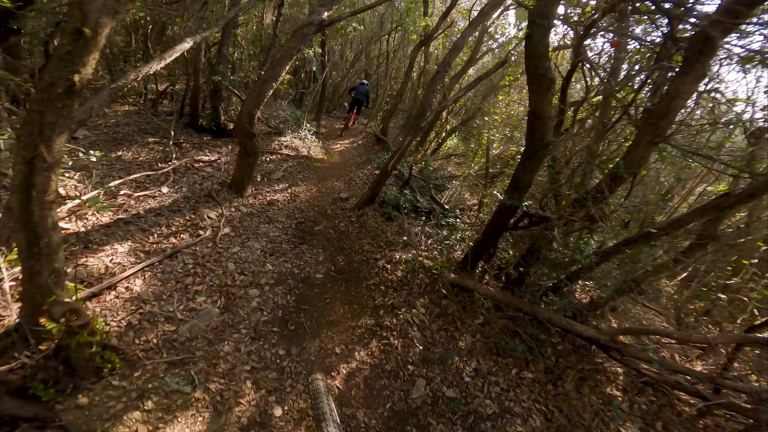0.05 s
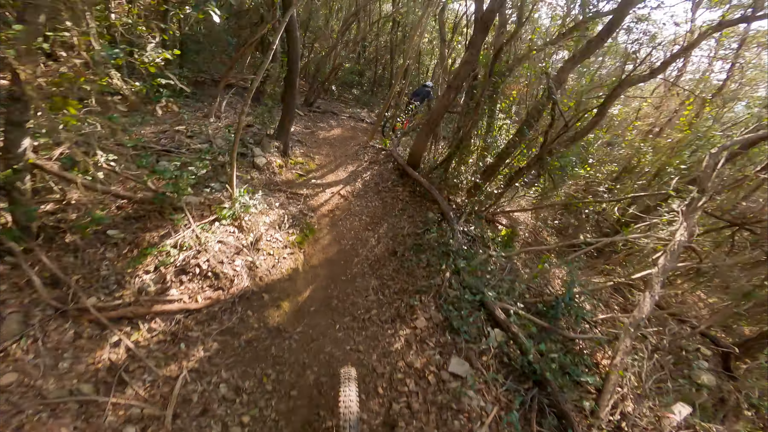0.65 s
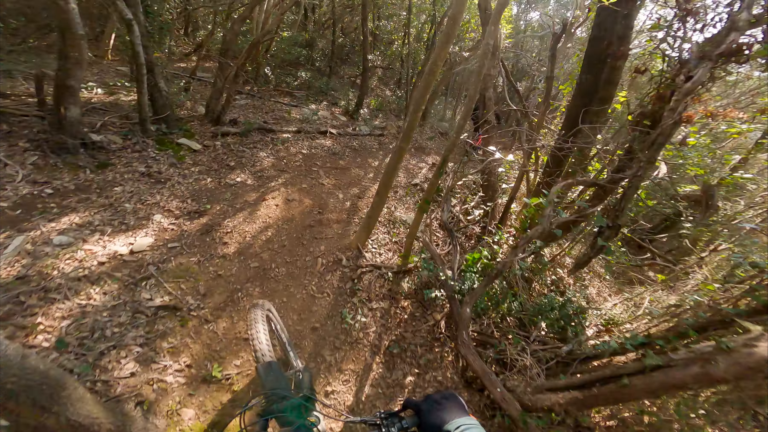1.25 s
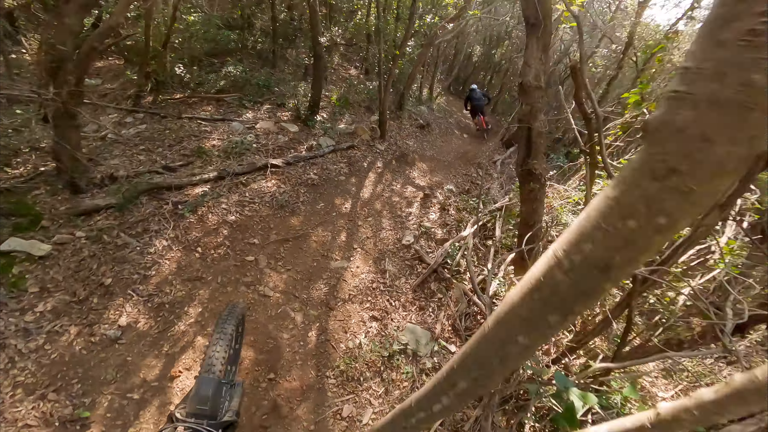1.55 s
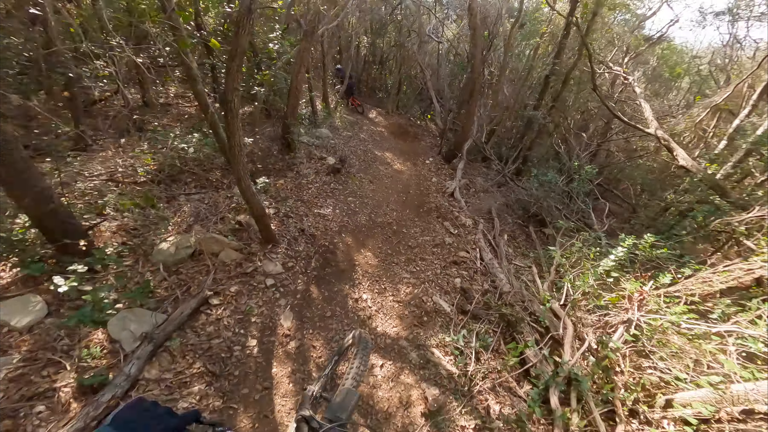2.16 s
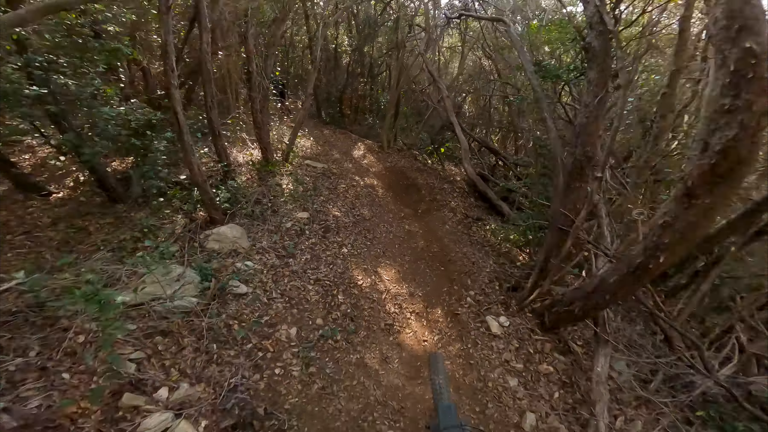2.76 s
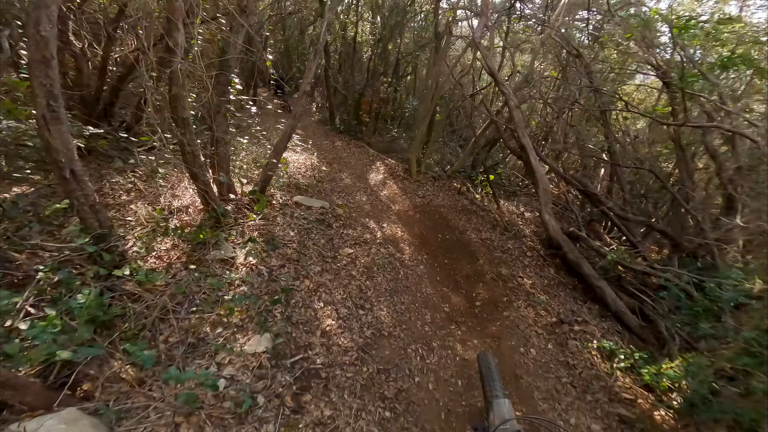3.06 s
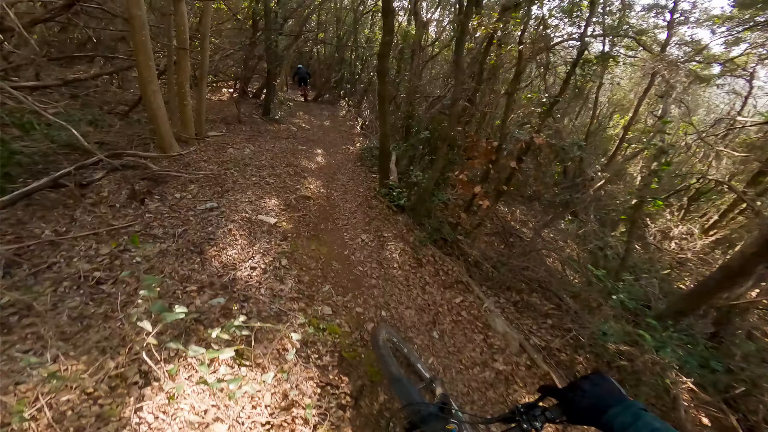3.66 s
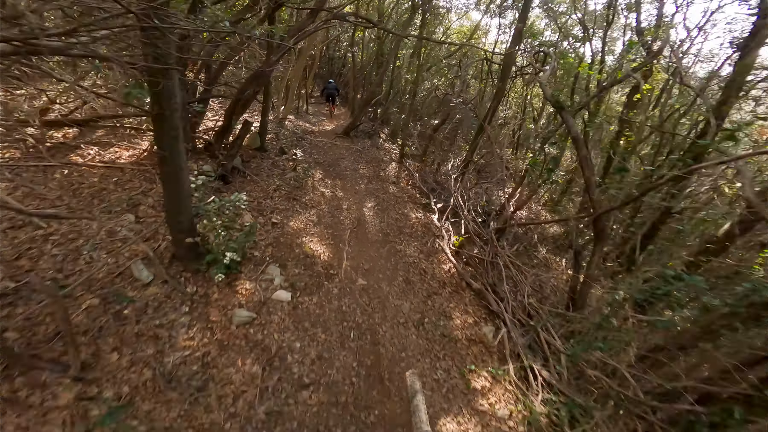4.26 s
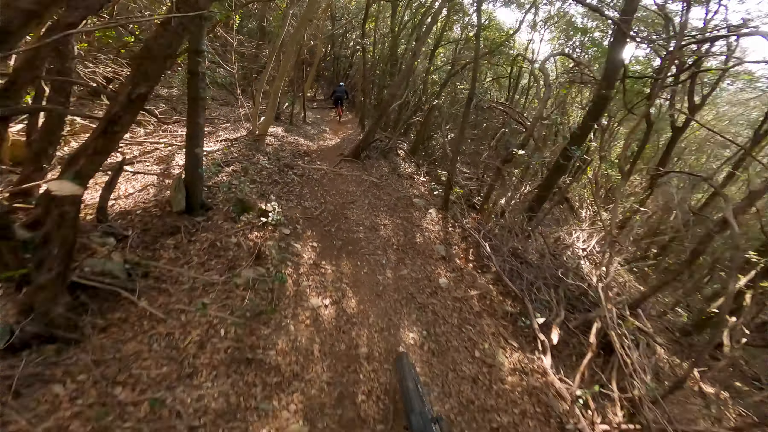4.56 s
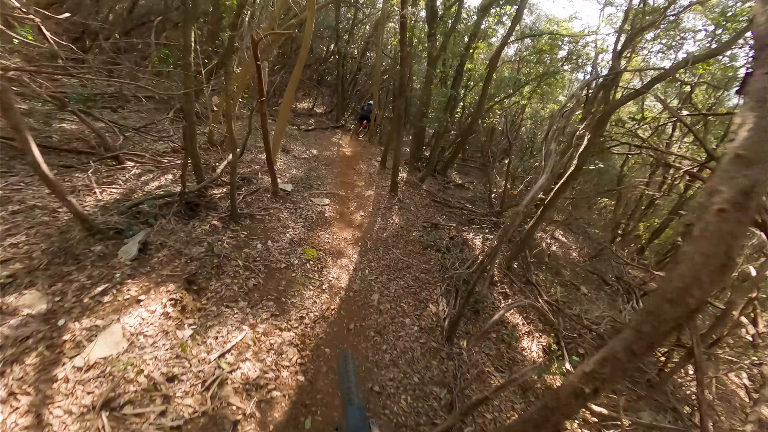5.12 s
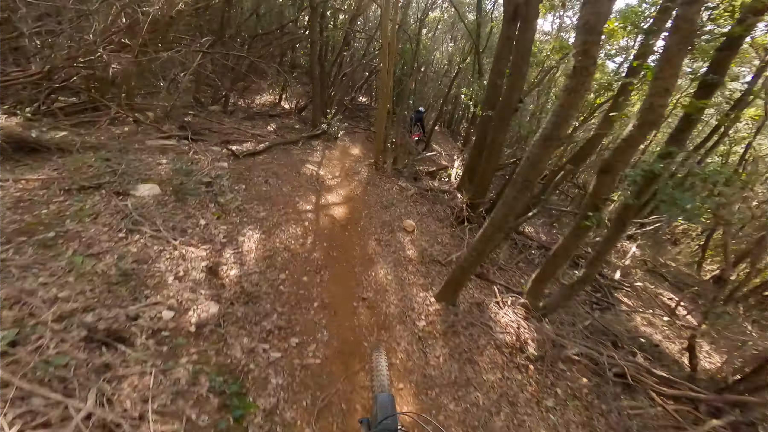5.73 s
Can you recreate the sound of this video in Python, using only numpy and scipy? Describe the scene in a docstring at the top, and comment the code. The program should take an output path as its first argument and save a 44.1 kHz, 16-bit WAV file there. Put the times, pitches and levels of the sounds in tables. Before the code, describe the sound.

Gusty wind thumps the microphone while bicycle tyres crunch along a leafy trail, with chain knocks and stone ticks.

```python
"""A mountain bike runs fast down a dry, leafy dirt trail, heard from a camera on the rider.
From the start, wind buffets the microphone, tyres crunch leaves and grit, bumps knock the chain and
cables on the frame, and stones tick on metal. From 1 to 1.7 s the brake disc grazes its pads and the
tyres scrape into a bend. The strongest gust tears past at 2.6 s, the tyres slide again from about
3.3 to 4.8 s, and the ride ends near 6 s with more gusts and knocks."""
import sys
import numpy as np
from scipy import signal
from scipy.fft import rfft, irfft, next_fast_len
from scipy.io import wavfile
from scipy.ndimage import uniform_filter1d, minimum_filter1d, map_coordinates

SR = 44100
rng = np.random.default_rng(int(sys.argv[2]) if len(sys.argv) > 2 else 0)


def dump(signal):
    """Clip the signal to [-1, 1] and save it as 16-bit WAV at the path in sys.argv[1]."""
    limited = np.clip(np.atleast_2d(signal).T, -1, 1)
    pcm = np.round(limited * 32767).astype(np.int16)
    wavfile.write(sys.argv[1], SR, pcm)


N = 264159

# How loud the roar of the air and its slow buffeting are: (time [s], relative level [dB])
ROAR_LEVEL = [(0.0, -24), (0.2, -24.5), (0.33, -28), (0.73, -30.5), (0.86, -24.5), (1.35, -32), (1.53, -32),
              (1.94, -37), (2.29, -26.5), (2.54, -21), (3.12, -25.5), (3.27, -39.5), (3.68, -27.5),
              (4.38, -21), (4.54, -33.5), (4.7, -21.5), (5.2, -22.5), (5.45, -22.5), (5.68, -32),
              (5.99, -35)]
BUFFET_LEVEL = [(0.0, -22.5), (0.55, -26.5), (0.8, -21.5), (1.57, -23.5), (1.78, -33), (2.08, -28),
                (2.55, -19.5), (3.65, -24.5), (4.75, -19), (5.99, -26.5)]
# Brief gusts and lulls that move both: (middle time [s], length [s], rise [dB])
GUSTS_AND_LULLS = [(0.03, 0.066, -0.5), (0.1, 0.058, -3), (0.18, 0.058, 1), (0.61, 0.029, 3.5),
                   (0.735, 0.034, -6), (1.04, 0.2, 2), (1.36, 0.24, 3.5), (2.18, 0.035, 0.5),
                   (2.32, 0.085, -3.5), (3.17, 0.018, -6), (3.205, 0.045, 6.5), (3.29, 0.08, -11),
                   (3.39, 0.074, 5.5), (3.54, 0.03, 8.5), (3.92, 0.037, 2.5), (4.09, 0.04, -4.5),
                   (4.47, 0.035, -6), (4.93, 0.072, -4.5), (5.46, 0.02, 5.5), (5.63, 0.0066, 11),
                   (5.72, 0.054, 0), (5.84, 0.15, 10), (5.99, 0.041, 9.5)]
# The wind's tone, from deepest to highest layer: (frequency [Hz], relative level [dB])
SWELL_TONE = [(8, -12), (22, 1.5), (42, -4), (60, -3.5), (110, -34), (300, -87)]
BUFFET_TONE = [(25, -43), (45, 3.5), (65, 1.5), (115, -1), (170, -12), (300, -23), (700, -85.5)]
ROAR_TONE = [(40, -61), (90, -5), (130, 2), (250, -1.5), (400, -6.5), (650, -12.5), (1000, -20),
             (2000, -44), (5000, -81)]
def wind():
    """Big swirls of air thump the microphone; faster air adds a roar that brightens as it grows."""
    gust_db = swells(GUSTS_AND_LULLS)
    roar_db = curve(ROAR_LEVEL) + gust_db
    buffet_db = curve(BUFFET_LEVEL) + 0.85 * gust_db + 1.07 * wobble(10)
    buffet = steadied(coloured(noise(N), BUFFET_TONE), span=0.063)
    swell = steadied(coloured(noise(N), SWELL_TONE), span=0.04)
    swell_db = -17 + 0.5 * buffet_db  # the deepest pressure swings ease less in the lulls
    swirls = noise(N) * amp(1.58 * wobble(90))
    bright = steadied(coloured(swirls, ROAR_TONE), span=0.05)
    dull = unit(filtered(bright, hump(0, 330)))
    force = np.clip((roar_db + 36.5) / 13, 0, 1)
    roar = force * bright + (1 - force) * dull
    return amp(swell_db) * swell + amp(buffet_db) * buffet + amp(roar_db + 3.5) * roar


# The tone of the strongest gust: (frequency [Hz], relative level [dB])
RUSH_TONE = [(200, -21), (400, 3), (620, -0.5), (900, -13), (1400, -24), (3000, -57.5)]
RUSH_AT_S, RUSH_LENGTH_S, RUSH_DB = 2.59, 0.25, -28.5
def rush():
    """The strongest gust tears at the microphone with a fluttering rush, higher than the roar."""
    level = swells([(RUSH_AT_S, RUSH_LENGTH_S, amp(RUSH_DB))])
    swirls = noise(N) * amp(2.1 * wobble(90))
    return level * steadied(coloured(swirls, RUSH_TONE), span=0.05)


# How loud rough ground, crushed leaves and flying grit are: (time [s], relative level [dB])
CHATTER_LEVEL = [(0.0, -34.5), (0.5, -34.5), (1.15, -32), (1.6, -31.5), (1.9, -37), (2.3, -28), (2.57, -36),
                 (2.75, -33), (3.12, -31.5), (3.27, -36.5), (3.36, -32), (3.55, -28.5), (3.75, -36),
                 (4.2, -30.5), (5.3, -32.5), (5.68, -34), (5.99, -31)]
LEAF_LEVEL = [(0.0, -50), (0.55, -49.5), (0.85, -48), (1.1, -42.5), (1.58, -47.5), (1.85, -46.5),
              (2.08, -46.5), (2.33, -39.5), (2.57, -46.5), (2.7, -47), (3.25, -45), (3.42, -42),
              (4.08, -43), (4.33, -48), (4.52, -42.5), (5.27, -45), (5.38, -53), (5.99, -40.5)]
GRIT_LEVEL = [(0.0, -58.5), (0.5, -61.5), (1.1, -54.5), (1.9, -55), (2.35, -49), (2.8, -64), (3.6, -68),
              (3.75, -49.5), (4.5, -55), (5.15, -53.5), (5.45, -63), (5.99, -54)]
# The tone of the same three: (frequency [Hz], relative level [dB])
CHATTER_TONE = [(150, -44), (450, -0.5), (800, 0), (1350, 1.5), (1800, -3.5), (2400, -11), (3200, -14.5),
                (5000, -29.5), (9000, -72)]
LEAF_TONE = [(800, -16), (2000, 2.5), (2800, 6), (3500, 2.5), (4400, 3.5), (5300, -3), (6700, -13),
             (8000, -11), (9000, -22.5), (10200, -35), (13000, -58.5)]
GRIT_TONE = [(3000, -34), (5500, 3.5), (6800, -1), (8000, 0), (9200, -6.5), (10200, -18), (11400, -31),
             (13000, -37)]
# Loose gravel is louder, smooth dirt quieter: (middle time [s], length [s], rise [dB])
GROUND_PATCHES = [(0.45, 0.091, 4.5), (0.63, 0.019, 4), (0.675, 0.039, -2), (0.72, 0.046, 9),
                  (1.29, .03, 8), (1.57, 0.066, 4.5), (1.88, 0.026, -7), (2.255, 0.038, 4.5),
                  (2.565, 0.057, -6), (2.67, 0.038, 0.5), (3.53, 0.1, 1), (4.09, 0.075, 2),
                  (4.265, 0.069, 3.5), (4.51, 0.024, 4), (4.95, 0.046, 5.5), (5.29, 0.058, 5.5),
                  (5.39, 0.081, 2.5), (5.53, 0.15, 5.5), (5.785, 0.074, 6.5)]
def tyres():
    """The tread drums on dirt, rattles loose parts, crushes leaves and flings grit, more so on gravel."""
    gravel_db = swells(GROUND_PATCHES)
    bumps_db = 1.5 * wobble(rate=24)
    crunch_db = curve(LEAF_LEVEL) + gravel_db + 0.39 * bumps_db
    spray_db = curve(GRIT_LEVEL) + gravel_db + 0.7 * bumps_db
    chatter_db = curve(CHATTER_LEVEL) + 0.46 * gravel_db + bumps_db
    dirt = steadied(coloured(grains(rate=1400, spread_db=1, t60=0.0084), CHATTER_TONE), span=0.029)
    loose_parts = steadied(unit(frame(grains(rate=170, spread_db=3.5, t60=0.028))), span=0.22)
    rustle = coloured(grains(rate=1100, spread_db=-1, t60=0.02), LEAF_TONE)
    crackle = steadied(coloured(grains(rate=130, spread_db=0, t60=0.046), LEAF_TONE), span=0.1)
    grit = coloured(grains(rate=1300, spread_db=-0.5, t60=0.012), GRIT_TONE)
    pebbles = steadied(coloured(grains(rate=30, spread_db=2, t60=0.0097), GRIT_TONE), span=0.55)
    chatter = amp(chatter_db - 1.5) * dirt + amp(chatter_db - 3.5) * loose_parts
    leaves = amp(crunch_db) * rustle + amp(crunch_db - 1) * crackle
    spray = amp(spray_db - 2) * (grit + amp(-8) * pebbles)
    return chatter + leaves + spray


# Sharp knocks, mostly the chain and cables hitting the frame: (time [s], relative level [dB], pitch [Hz], fade
# time [s])
FRAME_HITS = [(0.209, -16, 1700, 0.013), (0.212, -11, 2000, 0.02), (0.2238, -9.5, 2110, 0.013),
              (0.2648, -11.5, 1400, 0.0037), (0.2692, 5, 1700, 0.003), (0.2756, -13, 1680, 0.032),
              (0.518, -11.5, 1150, 0.025), (0.532, -19, 1250, 0.023), (0.568, -11, 1390, .016),
              (0.622, -11, 1300, 0.014), (0.724, -13, 1300, 0.021), (0.846, -12, 1200, 0.021),
              (0.939, -13, 2010, 0.035), (1.179, -12, 1900, .012), (1.278, -14, 1900, 0.034),
              (1.384, -11, 1500, 0.029), (1.398, -9, 1300, 0.015), (1.419, -8.5, 1150, 0.013),
              (1.495, -10.5, 1200, 0.019), (1.61, -19, 1300, .018), (1.685, -16.5, 1090, .035),
              (1.955, -9.5, 1280, 0.026), (2, -13, 1500, 0.012), (2.013, -9, 1350, 0.016),
              (2.024, -10.5, 1250, 0.021), (2.072, -16, 1490, .024), (2.117, -10.5, 1350, .026),
              (2.156, -14, 1000, 0.024), (2.272, -12, 1100, 0.03), (2.324, -12.5, 1500, 0.023),
              (2.645, -19, 1700, .03), (2.825, -11, 1400, 0.023), (3.001, -11, 1400, 0.035),
              (3.183, -7.5, 1300, 0.014), (3.248, -13, 1520, 0.012), (3.373, -8.5, 1100, 0.014),
              (3.398, -13, 1350, 0.033), (3.492, -9, 1350, 0.015), (3.555, -22, 1100, 0.013),
              (3.744, -16.5, 1200, 0.023), (3.825, -17, 1300, .016), (4.136, -9.5, 1300, 0.018),
              (4.437, -13, 1400, 0.025), (4.946, -9, 1800, 0.0096), (4.986, -11, 1250, 0.017),
              (5.066, -18, 1800, 0.058), (5.482, -9.5, 1920, 0.052), (5.49, -11, 1720, 0.053),
              (5.76, -20, 1400, .016), (5.792, -13, 1900, 0.042), (5.885, -15.5, 1620, 0.074),
              (5.959, -16, 1600, 0.014)]
def knocks():
    """Mostly chain and cables hitting the frame: one link clacks, several knock; where they land sets the tone."""
    track, t = np.zeros(N), np.arange(SR // 10) / SR
    for s, db, centre_hz, t60 in FRAME_HITS:
        blow = filtered(noise(len(t)), hump(centre_hz, 850))
        clack = steadied(frame(blow, stretch=1 + rng.normal(0, 0.06)), span=0.003)
        shape = rise_and_fall(t, rise=0.094 * t60, hold=0.15 * t60, fall=t60)
        add(track, s, amp(db - 11.5) * clack * shape)
    return track


# Where the frame and its plastic parts ring: (pitch [Hz], width [Hz], relative level [dB])
FRAME_NOTES = [(893, 385, -4.5), (1253, 282, 4.5), (1422, 430, 1), (2264, 550, -2), (2575, 670, -3.5),
               (4240, 1500, -27)]
def frame(x, stretch=1):
    """A hit x rings the frame dully, its pitches times stretch; padded tubes swallow the treble."""
    def response(hz):
        f = hz / stretch
        ringing = sum((-1) ** k * amp(db) * 1j * f * width / (pitch ** 2 - f ** 2 + 1j * f * width)
                      for k, (pitch, width, db) in enumerate(FRAME_NOTES))
        return ringing / (1 + 1j * hz / 4500) ** 2 / (1 + (hz / 3150) ** 10)
    return filtered(x, response)


# Roots and stones: (time [s], length [s], rattle level [dB], note pitch [Hz], note level [dB])
ROUGH_PATCHES = [(0.461, 0.03, -32.5, 1180, -29), (0.734, 0.04, -33.5, 1240, -38),
                 (1.269, 0.035, -34, 1400, -40), (1.573, 0.031, -29, 1050, -30),
                 (1.783, 0.021, -26.5, 950, -26), (2.15, 0.024, -24.5, 730, -22.5),
                 (2.21, 0.033, -42, 930, -39), (3.31, 0.035, -29, 1440, -33),
                 (3.47, 0.018, -31.5, 1400, -40), (3.541, 0.05, -30.5, 1020, -34),
                 (5.35, 0.019, -29.5, 845, -37), (5.483, 0.04, -29, 765, -28),
                 (5.536, 0.053, -33, 1300, -47), (5.791, 0.034, -23, 1310, -28.5),
                 (5.83, 0.031, -40, 1170, -26.5), (5.977, .02, -25.5, 800, -22)]
def shakes():
    """A rough patch throws the chain into a quick rattle over a hollow note."""
    notes, rattle_level, t = np.zeros(N), np.zeros(N), np.arange(SR // 10) / SR
    rattle = steadied(unit(frame(grains(rate=340, spread_db=-1, t60=0.011))), span=0.022)
    for s, length, rattle_db, note_hz, note_db in ROUGH_PATCHES:
        shape = rise_and_fall(t, rise=0.016, hold=length, fall=0.036)
        hollow = filtered(noise(len(t)), hump(note_hz, 260, steepness=2))
        add(rattle_level, s, amp(rattle_db) * shape)
        add(notes, s, amp(note_db) * shape * steadied(hollow, span=0.008))
    return notes + rattle_level * rattle


# Low booms from the ground: (middle time [s], length [s], level [dB], pitch [Hz])
GROUND_BOOMS = [(0.181, 0.12, -23, 219), (0.81, 0.14, -22.5, 118), (1.057, 0.27, -22.5, 126),
                (1.15, 0.4, -28.5, 234), (1.362, 0.22, -22.5, 115), (3.051, 0.24, -19.5, 113.6),
                (3.204, 0.026, -20.5, 263), (3.54, 0.035, -18.5, 270)]
def booms():
    """The bike presses into the ground with a smooth swell of low noise."""
    track, t = np.zeros(N), np.arange(SR // 2) / SR - 0.25
    for s, length, db, centre_hz in GROUND_BOOMS:
        rumble = filtered(noise(len(t)), hump(centre_hz, 0.39 * centre_hz, steepness=2))
        boom = amp(db) * np.exp(-(2 * t / length) ** 2) * steadied(unit(rumble), span=0.13)
        add(track, s + t[0], boom[s + t >= 0])
    return track


# Moments when the bike leans or drifts: (middle time [s], length [s], level [dB])
SLIDES = [(1.05, 0.33, -34.5), (1.307, 0.065, -36), (1.546, .2, -35), (3.44, 0.33, -41), (3.896, .36, -47),
          (4.67, 0.33, -37)]
# The tone of a slide: (frequency [Hz], relative level [dB])
SLIDE_TONE = [(600, -15), (1000, 6.5), (1450, 3.5), (1900, 2), (2400, -0.5), (3200, -7), (4100, -14),
              (4700, -6), (5400, -22), (7000, -39)]
def scrapes():
    """The tyres' side knobs slide over dirt and leaves in a gritty rasp that swells and fades."""
    level = swells([(s, length, amp(db)) for s, length, db in SLIDES])
    return level * steadied(coloured(grains(rate=800, spread_db=0, t60=0.015), SLIDE_TONE), span=0.06)


# Stone hits: (time [s], relative snap level [dB], relative ping level [dB], ping pitch [Hz])
STONE_HITS = [(0.101, -34, -47, 7800), (0.145, -32, -33, 5700), (0.1566, -25.5, -44, 6100),
              (0.214, -24, -50, 8000), (0.225, -37, -41, 7800), (0.268, -30, -42, 6500),
              (0.303, -29, -41, 6500), (0.602, -24, -49, 8000), (0.637, -23, -41, 7800),
              (0.712, -21.5, -38, 5840), (0.772, -29, -41, 5800), (0.809, -28, -38, 5800),
              (0.875, -25, -42, 5700), (0.969, -17, -49, 5000), (1.131, -40, -43, 6200),
              (1.18, -20, -38, 5700), (1.298, -35, -43, 6800), (1.357, -25, -40, 6300),
              (1.3818, -21.5, -39, 7000), (1.482, -29, -36, 6150), (1.5418, -20, -42, 5700),
              (1.655, -24, -42, 6200), (1.731, -37, -31.5, 6060), (1.742, -40, -43, 6200),
              (2.149, -21, -40, 6040), (2.2433, -18, -29.5, 6350), (2.262, -20.5, -31, 5700),
              (2.272, -16, -42, 6000), (2.324, -27, -37, 6000), (2.48, -23, -44, 5700),
              (2.652, -24, -39, 6000), (2.755, -23.5, -44, 6000), (3.155, -25, -52, 5700),
              (3.415, -27, -34, 5800), (3.47, -18.5, -45, 4700), (3.699, -23, -38, 6100),
              (3.747, -25, -39, 6200), (3.783, -31, -35, 6300), (3.825, -27, -38, 6100),
              (4.033, -31, -35, 5900), (4.086, -32, -32, 5900), (4.208, -24, -41, 5800),
              (4.233, -24, -32, 5640), (4.265, -24, -34, 7900), (4.283, -34, -40, 5900),
              (4.44, -20.5, -25, 5140), (4.613, -22, -45, 5700), (4.722, -23, -39, 7040),
              (4.975, -24, -36, 5670), (5.128, -31, -35, 7800), (5.14, -29, -33, 6060),
              (5.1633, -37, -39, 7800), (5.187, -22.5, -46, 5800), (5.236, -22, -40, 6000),
              (5.4, -38, -37, 5770), (5.413, -41, -37, 5900), (5.43, -35, -33, 5900),
              (5.768, -35, -33, 5970), (5.8037, -16, -38, 6800)]
# The tone of a snap: (frequency [Hz], relative level [dB])
SNAP_TONE = [(1000, -14), (3000, 10.5), (5300, 2.5), (7000, -19.5), (8500, -14.5), (10500, -24.5),
             (13000, -44)]
def ticks():
    """A stone hits a rim or spoke: a dry snap and a short, rough ping, pitched by the part it hits."""
    track, t = np.zeros(N), np.arange(SR // 10) / SR
    for s, db, ping_db, ping_hz in STONE_HITS:
        snap = steadied(coloured(noise(len(t)), SNAP_TONE), span=0.0022) * fade(t, t60=0.026)
        steel = hump(ping_hz, 1500, steepness=2)  # wide, as small steel parts barely ring
        ping = steadied(filtered(noise(len(t)), steel), span=0.0041) * fade(t, t60=0.024)
        onset = 1 - fade(t, t60=0.0027)
        add(track, s, (amp(db - 7) * snap + amp(ping_db - 2.5) * ping) * onset)
    return track


# The chain landing on the gears: (time [s], level [dB])
CHAIN_LANDINGS = [(0.213, -50), (0.606, -49), (2.243, -36), (4.086, -39.5), (4.265, -35), (4.44, -47),
                  (5.128, -46), (5.803, -41.5)]
SPROCKET_HZ, SPROCKET_WIDTH_HZ = 7930, 300
def chinks():
    """The slack chain lands on a sprocket (a gear wheel), which rings briefly at one high pitch."""
    track, t = np.zeros(N), np.arange(SR // 10) / SR
    sprocket = hump(SPROCKET_HZ, SPROCKET_WIDTH_HZ, steepness=2)
    for s, db in CHAIN_LANDINGS:
        ring = steadied(filtered(noise(len(t)), sprocket), span=0.008)
        add(track, s, amp(db) * ring * rise_and_fall(t, rise=0.0036, hold=0, fall=0.061))
    return track


# Light touches of the brake before the bend: (time [s], length [s], pitch [Hz], level [dB])
BRAKE_TOUCHES = [(1.017, 0.0066, 5230, -43), (1.195, .014, 5060, -46), (1.26, 0.021, 5380, -44),
                 (1.413, 0.0066, 5080, -40), (1.456, .009, 5130, -42), (1.484, 0.022, 5130, -47),
                 (1.539, .009, 5100, -46), (1.594, .008, 4980, -45), (1.631, .007, 5070, -42),
                 (1.67, 0.0085, 5170, -42)]
def brake():
    """Each graze of the pads makes the brake disc scrape out a short, thin, wavering note."""
    track, t = np.zeros(N), np.arange(SR // 10) / SR
    for s, length, hz, db in BRAKE_TOUCHES:
        wavering_hz = hz * (1 + 0.023 * wobble(830)[:len(t)])
        phase = 2 * np.pi * np.cumsum(wavering_hz) / SR
        shape = rise_and_fall(t, rise=0.022, hold=length, fall=0.022)
        add(track, s, amp(db) * shape * unit(np.sin(phase)))
    return track


# How loud the highest hiss is: (time [s], relative level [dB])
HISS_LEVEL = [(0.0, -82), (0.86, -86), (1.0, -71), (1.66, -74), (1.76, -80), (2.08, -80), (2.26, -67),
              (2.5, -70), (2.6, -78.5), (3.6, -78), (3.7, -70.5), (5.25, -77), (5.42, -87), (5.99, -74)]
# Its tone: (frequency [Hz], relative level [dB])
HISS_TONE = [(9000, -31), (10400, -8), (11200, 3.5), (12300, -4.5), (13200, -6), (15000, -37)]
def hiss():
    """A faint, grainy hiss above the grit comes and goes, and rises on loose gravel."""
    level_db = curve(HISS_LEVEL) + 0.8 * swells(GROUND_PATCHES) + wobble(14)
    return amp(level_db) * coloured(grains(rate=1200, spread_db=-1, t60=0.012), HISS_TONE)


def amp(db):
    """Turn decibels into a number to multiply by."""
    return 10 ** (np.asarray(db) / 20)


def unit(x):
    """Scale x to an average (rms) level of 1."""
    return x / np.sqrt(np.mean(x ** 2) + 1e-20)


def noise(samples):
    """Plain white noise."""
    return rng.standard_normal(samples)


def curve(rows):
    """Join (time [s], value) points with straight lines."""
    return np.interp(np.arange(N) / SR, *np.transpose(rows))


def swells(rows):
    """Add up bell-shaped rises given as (middle time [s], length [s], height)."""
    t = np.arange(N) / SR
    return sum(height * np.exp(-(2 * (t - s) / length) ** 2) for s, length, height in rows)


def wobble(rate):
    """A smooth curve through rate random points a second."""
    return map_coordinates(noise(int(N * rate / SR) + 4), [np.arange(N) * rate / SR])


def grains(rate, spread_db, t60):
    """Tiny random bursts, about rate a second, each fading in t60 seconds."""
    starts = rng.random(N) < rate / SR
    sizes = starts * amp(spread_db * np.clip(noise(N), -2, 2))
    energy = signal.lfilter([1], [1, -amp(-120 / (t60 * SR))], sizes ** 2)
    return unit(np.sqrt(energy) * noise(N))


def filtered(x, response):
    """Turn each frequency in x up or down by response(hz)."""
    size = next_fast_len(len(x) + 8192)
    return irfft(rfft(x, size) * response(np.fft.rfftfreq(size, 1 / SR)), size)[:len(x)]


def hump(centre_hz, width_hz, steepness=1):
    """A filter shape that keeps the frequencies near centre_hz."""
    return lambda hz: 1 / (1 + ((hz - centre_hz) / width_hz) ** 2) ** steepness


def coloured(x, tone):
    """Shape x with a tone table, at an average level of 1."""
    f, db = np.transpose(tone)
    return unit(filtered(x, lambda hz: amp(np.interp(np.log(hz + 1), np.log(f), db))))


def steadied(x, span):
    """Even out changes in loudness slower than span seconds."""
    return x / np.sqrt(np.abs(uniform_filter1d(x ** 2, int(span * SR))) + 1e-6)


def fade(t, t60):
    """Die away, 60 dB down after t60 seconds."""
    return np.exp(-np.log(1000) * t / t60)


def rise_and_fall(t, rise, hold, fall):
    """Fade in, then fade out from time hold; all in seconds."""
    return (1 - fade(t, rise)) * fade(np.maximum(t - hold, 0), fall)


def add(track, s, sound):
    """Mix a sound into the track at s seconds."""
    part = track[max(round(s * SR), 0):][:len(sound)]
    part += sound[:len(part)]


def scene():
    """Everything is close and in the open air, so nothing echoes."""
    air_and_ground = wind() + rush() + booms() + tyres() + scrapes() + hiss()
    bike_parts = knocks() + shakes() + ticks() + chinks() + brake()
    return (air_and_ground + bike_parts)[None]


def record(dry):
    """The camera turns down the loudest peaks and cuts off the highest treble."""
    knee_db, top_hz = -9, 13200
    needed = np.minimum(1, amp(knee_db) / (np.abs(dry[0]) + 1e-9)) ** 0.7
    gain = uniform_filter1d(minimum_filter1d(needed, size=500), size=400)
    return filtered(dry[0] * gain, lambda hz: hz < top_hz)[None]


dry = scene()
out = record(dry)
dump(out)
```